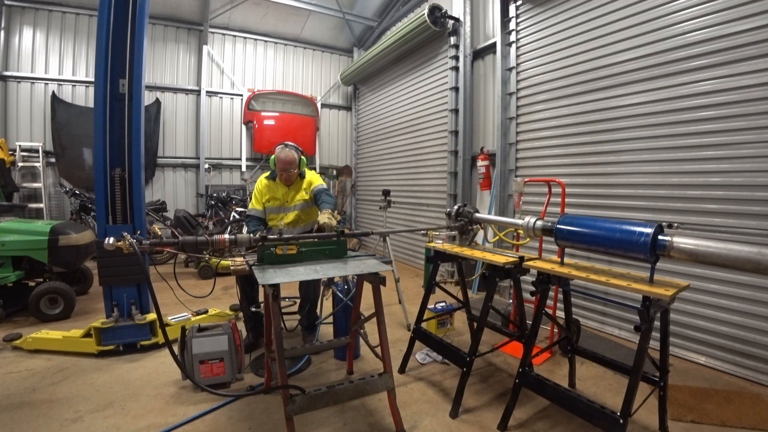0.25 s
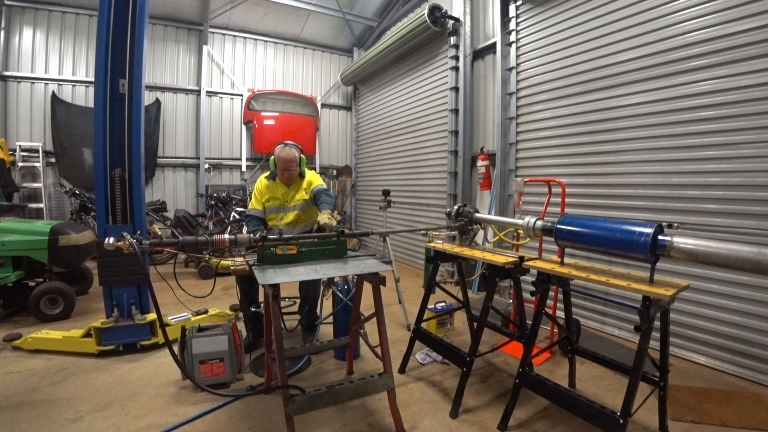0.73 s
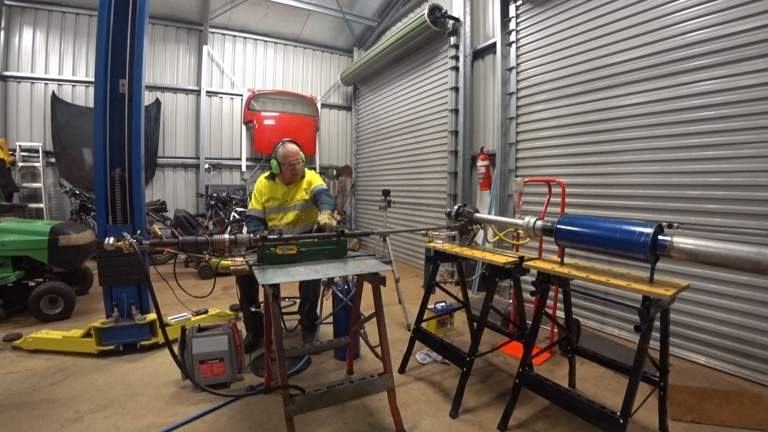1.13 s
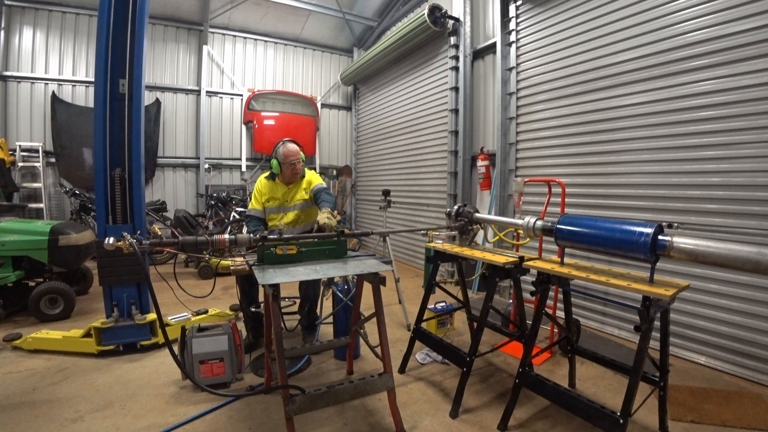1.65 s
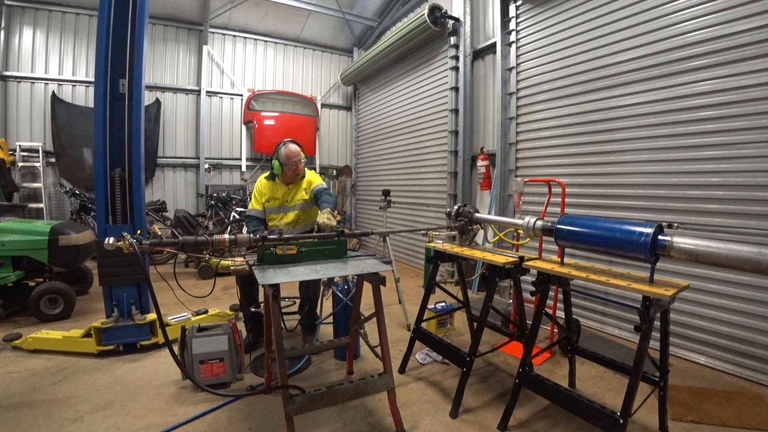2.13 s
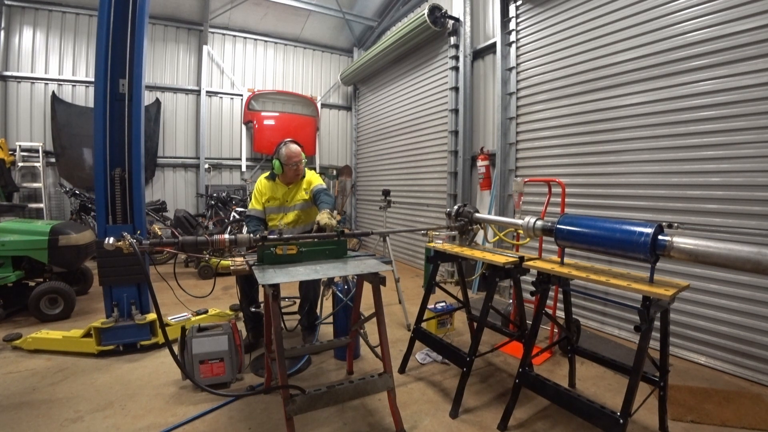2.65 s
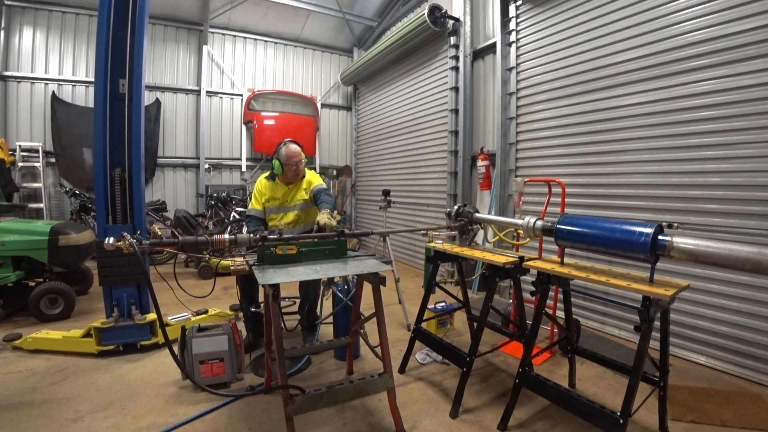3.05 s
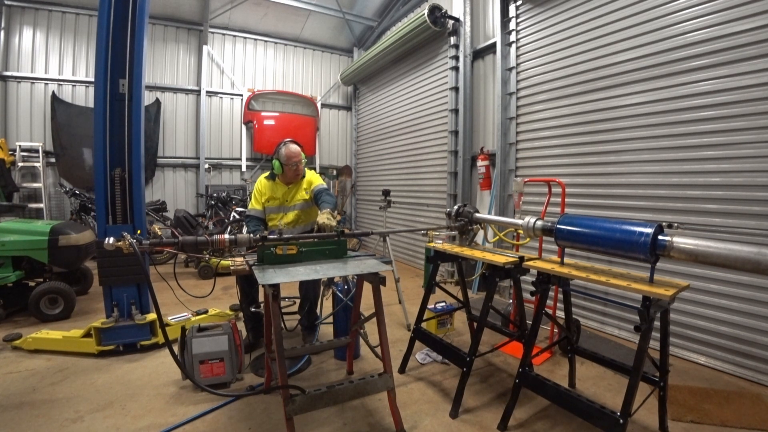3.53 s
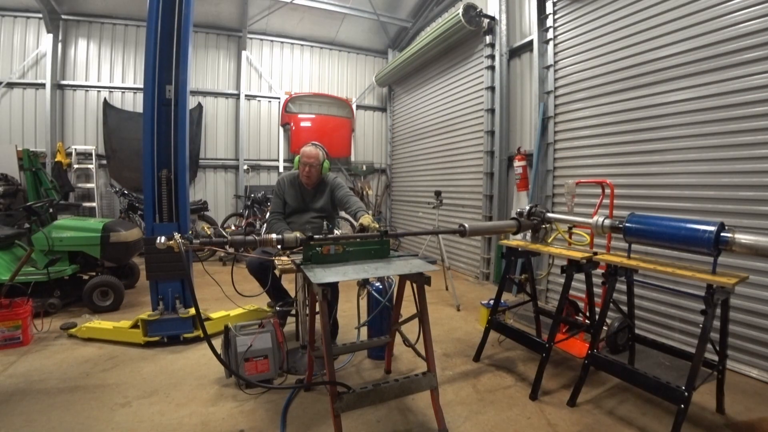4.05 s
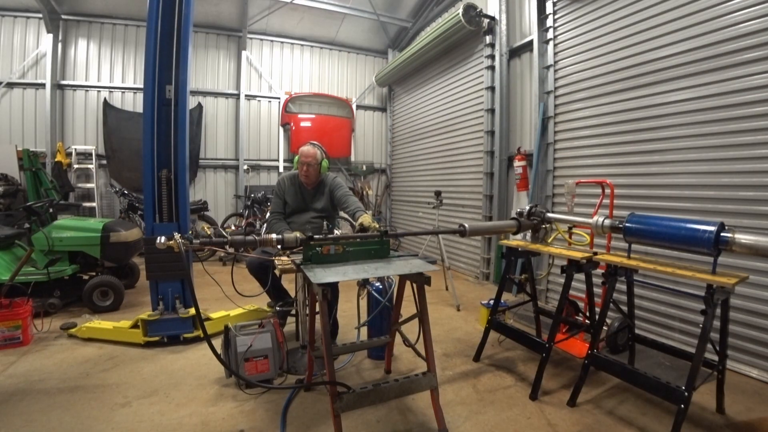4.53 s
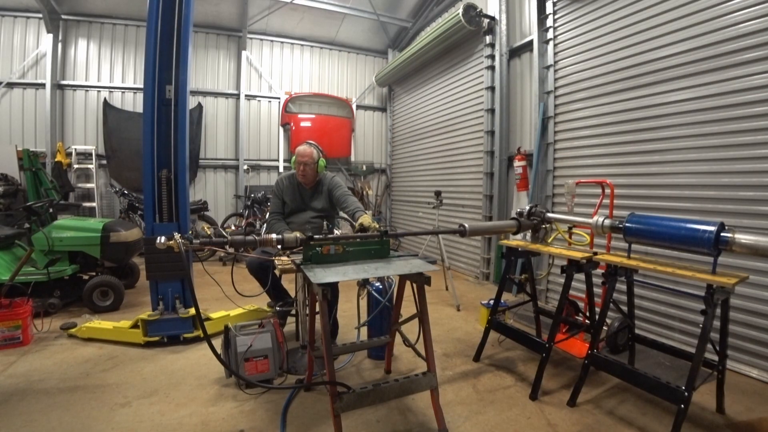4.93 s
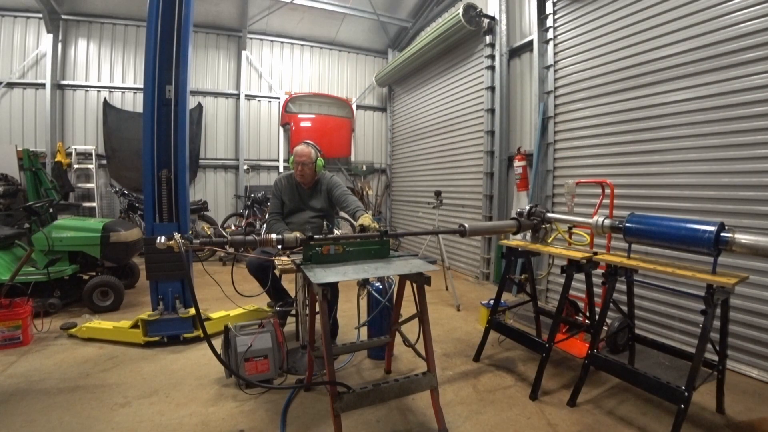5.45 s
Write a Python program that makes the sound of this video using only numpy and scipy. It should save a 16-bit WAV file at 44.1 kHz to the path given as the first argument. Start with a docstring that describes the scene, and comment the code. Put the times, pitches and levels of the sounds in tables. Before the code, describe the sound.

A homemade pulse engine cracks and booms in irregular, deafening bangs inside a steel shed, then cuts abruptly to a faint steady gas hiss.

```python
"""A homemade pulse detonation engine runs in a steel shed, its gas valve spitting twenty times a second.
Only some charges detonate: each cracks, booms and slaps back off the walls; others just pop or roar.
Blasts, pops, spits and hiss are shaped noise; the echoes and thumps are short waves of a few cycles.
A limiter squashes the din. Then comes a cut, reverberation and all, to a separate stretch of gas hiss,
coloured by the resonances of pipework."""
import sys
import numpy as np
from scipy import signal
from scipy.fft import rfft, irfft, next_fast_len
from scipy.io import wavfile

SR = 44100
rng = np.random.default_rng(int(sys.argv[2]) if len(sys.argv) > 2 else 0)


def unload_wav(signal):
    """Save mono or channel-first audio to the path in sys.argv[1] as 16-bit WAV at rate SR, clipped to [-1, 1]."""
    wavfile.write(
        sys.argv[1],
        SR,
        np.round(np.clip(np.atleast_2d(signal).T, -1, 1) * 32767).astype(np.int16),
    )


N = 251370

# charges that detonate: (time [s], strength [dB], crack [dB], ring length [factor],
# boom [dB], body [dB], bark [dB])
DETONATIONS = [(-.1, -0.5, -9, 0.88, 6, 1.5, 3), (.044, -1.5, 0, 1.35, 4, 3, 3),
               (.343, 0.5, -2, 1.71, 5, -4.5, 3.5), (.644, -3.5, 7.5, 1.7, -1, 2, -5),
               (.995, -1, 4, 1.1, 6, -0.5, 1.5), (1.196, 0, -5, 0.97, -3, 1.5, 2.5),
               (1.394, -1, -7.5, 0.86, 4, -0.5, 4), (1.496, -0.5, -7, 0.95, 2, 2.5, 3),
               (1.645, 2.5, -19, 0.7, 1, 0.5, 1.5), (1.797, -1.5, 5, 1.04, 0.5, 3, 0),
               (1.947, -0.5, -7, 0.63, 0, -3, 2), (2.048, -.5, -15, 0.91, 2.5, 1, 2.5),
               (2.247, -1, 6.5, 1.28, 5, 1.5, 0.5), (2.547, -3.5, -2, 1.02, 2.5, 2, 5),
               (2.697, -1, 3, 1.28, 3.5, 0, 4.5), (2.897, -2.5, 1, 1.13, 0, -1, 2.5),
               (2.997, 0, 3.5, 0.46, 3, 1, 2), (3.097, 2, -1, 1.33, -4, -1, 4.5),
               (3.198, 1, 1, 0.66, -11.5, 1.5, -2), (3.299, 2.5, -2, 0.78, -7, 0.5, 4.5),
               (3.399, 1.5, 1, 0.69, -2, 1, 3.5), (3.499, -2.5, -2, 2.2, -3, -2.5, 5.5)]
# weak burns placed singly, in time order: (time [s], relative level [dB])
WEAK_BURNS = [(.16, -9.5), (.212, -6), (.445, -9.5), (.509, -12), (.562, -13), (.594, -15), (.705, -5),
              (.799, -11), (.945, -19), (1.111, -6.5), (1.56, -6.5), (2.314, -11), (2.364, -4.5),
              (2.465, -5.5), (2.815, -9), (3.55, -16)]
# hard spits of the valve: (time [s], relative level [dB])
HARD_SPITS = [(.273, 0), (0.444, -5), (0.745, -6.5), (0.8, -2.5), (.898, -8), (1.891, 0.5), (2.362, -4.5),
              (2.417, -2), (2.469, -7), (2.647, -12), (2.749, -3), (2.797, -5.5), (2.947, -4), (3.024, 0.5),
              (3.137, -10), (3.229, -14), (3.335, -13), (3.44, -5), (3.548, -5), (3.582, -4)]
# broad colour of a blast: (frequency [Hz], relative level [dB])
BLAST_COLOUR = [(25, -40), (65, -20.5), (100, -25), (135, -13), (205, -14), (285, -2), (520, -4),
                (850, -6.5), (1300, -11), (1900, -15.5), (2900, -15), (4500, -22), (6200, -14), (8300, -17),
                (11200, -12.5), (15500, -21)]
# resonances of tube and shed: (frequency [Hz], width [Hz], relative level [dB])
TUBE_MODES = [(316.7, 26, 5), (421, 9.2, 10), (496, 19, -4.5), (557, 6, 3), (627, 13, 0.5), (659, 30, -3.5),
              (712, 12, -1), (799.6, 24, 8), (993, 19.5, -1), (1110, 5.7, -10), (1187, 10, 1.5),
              (1234, 11, -4)]
# left minus right for the engine: (frequency [Hz], difference [dB])
ENGINE_PAN = [(60, 0), (110, 1), (200, -4), (380, -2.5), (700, -4.5), (1290, -0.5), (2380, 0.5), (4400, 1),
              (8120, 1), (15000, -0.5)]

CUT_S = 3.609  # the cut to the hiss
RING = 32768  # samples worked out for one blast
VALVE_FIRST_S, VALVE_CYCLE_S = .0435, .05007


def engine():
    """Detonations led by their shock fronts, roaring flames, dull pops of weak burns and bright spits."""
    blasts = detonations(same_share=0.4, modes_db=-2.5, direct_s=0.012, swell_s=0.019, swell_share=0.58)
    waves = pressure_waves(scatter_db=2.36, scatter_octaves=0.045, pop_db=4.5, pop_fade_s=0.067)
    flames = roars(width_octaves=0.22, skirt_hz=1940)
    # pops and punches are kept free of deep bass
    bass_cut = signal.butter(4, 240, "high", fs=SR, output="sos")
    puffs = signal.sosfilt(bass_cut, weak_pops() + punches())
    mix = from_db(-16.5) * blasts + waves + thumps() + flames
    return mix + from_db(-10.0) * snaps() + from_db(-2.5) * puffs + from_db(-5.5) * spits()


def detonations(same_share, modes_db, direct_s, swell_s, swell_share):
    """Every blast takes the same paths through the shed: its boom partly repeats, its treble is new."""
    # ringing steel: (frequency [Hz], width [Hz], relative level [dB])
    steel_modes = [(1336, 29, -5), (1480, 50, -8.5), (1714, 20, -8), (2780, 160, -8.5), (2870, 26, -11),
                   (3200, 84, -15), (4170, 460, -18.5), (5350, 460, -17), (5500, 48, -18), (6700, 140, -11),
                   (10000, 180, -10), (11700, 100, -6), (11780, 110, -7.5)]
    # the shed by band: (frequency [Hz], time to fall 60 dB before the ring length factor [s],
    # direct sound over reverberation before each crack [dB], rise [s])
    shed_bands = [(102, 1.47, -19, 0.045), (333, 1.4, -26, 0.069), (690, 1.12, 3, 0.00094),
                  (1370, 1.17, -33, 0.003), (3270, 1.83, -23, 0.00033), (5500, 1.22, 0, 0.00033),
                  (11400, 0.46, -8.5, 0.00039)]
    hz, t, out = bins(RING), np.arange(RING) / SR, np.zeros((2, N))
    colour = resonant(hz, BLAST_COLOUR, TUBE_MODES + steel_modes, modes_db)
    # the roughness grows with pitch
    colour = colour * ripple(RING, spacing_hz=28.4, depth_db=2.5) ** (hz / (hz + 1500))
    centres, t60, direct_db, rise = np.array(shed_bands).T[:, :, None]
    # overlapping bands that add up to the whole
    bands = np.array([at_hz(np.c_[centres, share], hz) for share in np.eye(len(shed_bands))])
    direct = from_db(direct_db) * np.exp(-t / direct_s)
    # the fronts arrive, then the reverberation builds a little before it dies
    attack = 1 - np.exp(-t / rise)
    swell = 1 - swell_share * np.exp(-t / swell_s)
    same = np.clip(same_share, 0, 1) / (1 + (hz / 2500) ** 2)
    paths = stereo_noise(RING, ENGINE_PAN)
    for s, db, crack_db, length, *burn_db in DETONATIONS:
        field = np.sqrt(same) * paths + np.sqrt(1 - same) * stereo_noise(RING, ENGINE_PAN)
        # no two charges burn alike: each has its own boom, bark and uneven spectrum
        burn = burn_colour(hz, burn_db) * ripple(RING, spacing_hz=70.25, depth_db=3.0)
        decay = from_db(-60 * t / (t60 * length))
        envelope = attack * (swell + from_db(crack_db) * direct) * decay
        in_bands = irfft(field * colour * burn * bands[:, None])
        blast = np.sum(in_bands * envelope[:, None], axis=0)
        add(out, from_db(db) * blast, s)
    return out


def burn_colour(hz, levels_db):
    """Gain from one charge's boom, body and bark: three broad bumps in its spectrum."""
    # boom, body and bark: (frequency [Hz], width [octaves])
    burn_bumps = [(280, 0.68), (780, 0.13), (1205, 0.36)]
    return from_db(sum(db * hump(hz, centre, octaves) for db, (centre, octaves) in zip(levels_db, burn_bumps)))


def pressure_waves(scatter_db, scatter_octaves, pop_db, pop_fade_s):
    """Each firing sends a wave of a few cycles round the shed; every surface throws back its own part."""
    # the pressure wave and its returns from floor, walls and roof:
    # (delay [s], spread [s], typical frequency [Hz], typical level [dB])
    echo_paths = [(.003, 0.0013, 710, -10), (.0095, 0.0015, 452, -22), (.0115, 0.002, 750, -16.5),
                  (.021, 0.0025, 770, -18.5), (.028, 0.0034, 318, -23.5), (0.033, 0.002, 1160, -22),
                  (.038, 0.0022, 430, -17.5), (.0455, 0.0037, 760, -20.5), (.049, 0.0022, 415, -22.5),
                  (0.053, 0.002, 1190, -28.5), (.058, .003, 337, -25), (.063, 0.0014, 660, -17),
                  (.069, 0.0025, 765, -21), (.072, 0.0029, 403, -27), (.077, 0.0028, 635, -26.5),
                  (.081, 0.002, 470, -19), (.085, 0.0031, 805, -20), (.105, 0.0023, 745, -19),
                  (.109, 0.0025, 408, -28), (.123, 0.0047, 313, -34)]
    t, out = np.arange(RING // 4) / SR, np.zeros((2, N))
    delay, spread, centre, level_db = np.array(echo_paths).T[:, :, None]
    phase = rng.random(delay.shape)
    pan = from_db(np.array([[1], [-1]]) * at_hz(ENGINE_PAN, centre.T) / 2)
    firings = [(s, from_db(db) * burn_colour(centre, burn_db)) for s, db, _, _, *burn_db in DETONATIONS]
    # the later echoes of a weak burn are fainter
    firings += [(s, from_db(db + pop_db) * np.exp(-delay / pop_fade_s)) for s, db in WEAK_BURNS]
    for s, gain in firings:
        louder, higher = rng.standard_normal((2, len(echo_paths), 1))
        pitch = centre * 2 ** (scatter_octaves * higher)
        cycles = np.cos(2 * np.pi * (pitch * (t - delay) + phase))
        waves = np.exp(-.5 * ((t - delay) / spread) ** 2) * cycles
        add(out, pan @ (gain * from_db(level_db + scatter_db * louder) * waves), s)
    return out


def thumps():
    """A short low wave comes a moment after every detonation."""
    delay_s, spread_s, pitch_hz, level_db = 0.062, 0.0037, 170, -29
    t, out = np.arange(RING // 4) / SR - delay_s, np.zeros((2, N))
    wave = np.exp(-.5 * (t / spread_s) ** 2) * np.cos(2 * np.pi * pitch_hz * t)
    pan = from_db(np.array([[1], [-1]]) * at_hz(ENGINE_PAN, pitch_hz) / 2)
    for s, db, *_ in DETONATIONS:
        add(out, from_db(db + level_db) * pan * wave, s)
    return out


def shock_fronts():
    """Detonations as sharp fronts, stronger where the crack is: (time [s], relative level [dB])."""
    return [(s, db + 0.44 * crack_db) for s, db, crack_db, *_ in DETONATIONS]


def snaps():
    """Each shock front makes a very short burst of high treble."""
    colour = hump(bins(RING // 2), 12600, 0.22)
    return bursts(shock_fronts(), colour, rise_s=0.0023, fall_s=0.0047,
                  room_db=-17, room_t60=.2, lead_s=.0011)


def punches():
    """The pressure front comes straight from the tube's mouth as a short, broad burst."""
    hz = bins(RING // 2)
    colour = resonant(hz, BLAST_COLOUR, TUBE_MODES, 0) * hump(hz, 2210, 1.06)
    return bursts([(s, db - 14.5) for s, db in shock_fronts()], colour, rise_s=0.0011, fall_s=0.0071,
                  room_db=-24, room_t60=0.21, lead_s=.0003)


def weak_pops():
    """Charges that fail to detonate give dull pops coloured by the tube."""
    hz = bins(RING // 2)
    colour = resonant(hz, BLAST_COLOUR, TUBE_MODES, 0) * hump(hz, 280, 2.6)
    return bursts(WEAK_BURNS + idle_cycles(-19.5, scatter_db=3.0), colour, rise_s=0.0056, fall_s=0.012,
                  room_db=-17.0, room_t60=0.79, lead_s=0.00049)


def spits():
    """The valve lets out bright, short jets of gas."""
    hz = bins(RING // 2)
    jet = hump(hz, 11560, 0.22) + 0.5 * hump(hz, 5400, 0.99)
    jet = jet * ripple(RING // 2, spacing_hz=128.3, depth_db=2.5)
    return bursts(valve_spits(lag_s=.0015), jet, rise_s=0.0044, fall_s=0.0048,
                  room_db=-22.5, room_t60=0.48, lead_s=0.0019)


def valve_spits(lag_s):
    """Soft spits on the valve's beat, one after each detonation, and hard ones: (time [s], relative level [dB])."""
    soft = [(s + lag_s, db) for s, db in idle_cycles(-11.5, scatter_db=2.5)]
    # the valve stays shut after a detonation, then spits
    blowback_s, blowback_db = 0.0705, -8.5
    return soft + [(s + blowback_s, blowback_db) for s, *_ in DETONATIONS] + HARD_SPITS


def idle_cycles(db, scatter_db):
    """Valve beats free of hard spits, detonations and the beat after each: (time [s], relative level [dB])."""
    ticks = np.arange(VALVE_FIRST_S, CUT_S, VALVE_CYCLE_S)
    levels = db + scatter_db * rng.standard_normal(len(ticks))
    fired = [s + k * VALVE_CYCLE_S for s, *_ in DETONATIONS for k in range(2)]
    taken = np.array(fired + [s for s, _ in HARD_SPITS])
    free = np.abs(ticks[:, None] - taken).min(axis=1) > VALVE_CYCLE_S / 4
    return list(zip(ticks[free], levels[free]))


def bursts(events, colour, rise_s, fall_s, room_db, room_t60, lead_s):
    """Short puffs of gas, each trailed by the shed's reverberation."""
    size = RING // 2
    t, out = np.arange(size) / SR, np.zeros((2, N))
    tail = from_db(room_db) * np.exp(-np.log(1000) * t / room_t60)
    envelope = (1 - np.exp(-(t / rise_s) ** 2)) * np.hypot(np.exp(-t / fall_s), tail)
    even_colour = colour / np.sqrt(np.mean(colour ** 2))  # rms 1
    for s, db in events:
        puff = irfft(stereo_noise(size, ENGINE_PAN) * even_colour)
        add(out, from_db(db) * envelope * puff, s - lead_s)
    return out


def roars(width_octaves, skirt_hz):
    """A slow flame rushes down the tube: a harsh note that swells and dies away."""
    # charges that burn on as a roar:
    # (time [s], level [dB], centre frequency [Hz], time to swell [s], rasp [dB])
    slow_flames = [(.343, -17, 1200, 0.028, -14), (.385, -18, 1260, 0.023, -8),
                   (.455, -24.5, 1240, 0.039, -3), (3.10, -23, 1090, 0.045, -28),
                   (3.298, -35, 990, 0.13, -22)]
    hz, t, out = bins(RING), np.arange(RING) / SR, np.zeros((2, N))
    for s, db, centre_hz, swell_s, rasp_db in slow_flames:
        colour = hump(hz, centre_hz, width_octaves) + from_db(rasp_db) * hump(hz, skirt_hz, 0.6)
        colour = colour * ripple(RING, spacing_hz=62.2, depth_db=2.5)
        flame = irfft(stereo_noise(RING, ENGINE_PAN) * colour / np.sqrt(np.mean(colour ** 2)))
        swell = t / swell_s * np.exp(1 - t / swell_s)
        add(out, from_db(db) * swell * flame, s)
    return out


def limiter(x, threshold_db, excess_fall_db_per_s, sense_s, slope):
    """The gain drops just ahead of each front, and creeps back during the tail."""
    look_ahead_s = .004
    keep = np.exp(-1 / (sense_s * SR))
    power = signal.lfilter([1 - keep], [1, -keep], np.mean(x ** 2, axis=0))
    over = np.maximum(10 * np.log10(np.maximum(power, 1e-12)) - threshold_db, 0)
    # the excess jumps up at once but falls at a steady rate
    ramp = excess_fall_db_per_s * np.arange(N) / SR
    held = np.maximum.accumulate(over + ramp) - ramp
    ahead = np.interp(np.arange(N) + look_ahead_s * SR, np.arange(N), held)
    return x * from_db(-np.clip(slope, 0, 1) * ahead)


def gas_hiss():
    """A steady flow of gas sounds the resonances of the pipework; the lowest ones waver."""
    # turbulence of the gas: (frequency [Hz], relative level [dB])
    turbulence = [(30, -58), (110, -38.5), (330, -23), (520, -14), (690, -15), (780, -8), (1100, -10.5),
                  (1330, -10.5), (1450, -13.5), (2300, -12), (3050, -5), (3500, -14.5), (8800, -14),
                  (9900, -24), (12300, -18.5), (13400, -28), (15500, -29)]
    # pipework resonances: (frequency [Hz], width [Hz], relative level [dB])
    pipe_modes = [(894, 13, 3.5), (966, 30, -4), (1020, 40, -12), (1217, 45, -1), (1300, 38, -3.5),
                  (1518, 19, 5), (1790, 24, -2.5), (1850, 55, -2), (1954, 68, -5), (2766, 127, -1.5),
                  (4260, 150, -6), (4545, 68, -7.5), (4855, 60, -9), (5100, 130, -8), (5550, 68, -11),
                  (5950, 55, -0.5), (6330, 150, -11), (6640, 61, -13), (7160, 56, -11), (7900, 61, -12),
                  (8670, 270, -7.5), (9130, 114, -4.5), (9700, 49, -12), (10600, 130, -14),
                  (11060, 180, -11.5), (11700, 90, -14), (12520, 170, -12), (14000, 160, -22)]
    # left minus right: (frequency [Hz], difference [dB])
    hiss_pan = [(60, -0.5), (110, 0), (200, -1.0), (380, -2.5), (700, -3.5), (1290, -1.5), (2380, 0.0),
                (4400, 1.0), (8120, 0.0), (15000, -0.5)]
    # pipe resonances that waver: (frequency [Hz], width [octaves], depth [dB])
    wavering_modes = [(930, 0.11, 3), (1250, 0.15, 2), (1840, 0.21, 0.8)]
    size = next_fast_len(N + N % 2)
    hz = bins(size)
    colour = resonant(hz, turbulence, pipe_modes, modes_db=0.5)
    colour = colour * ripple(size, spacing_hz=34.22, depth_db=4.5) ** (hz / (hz + 1500))
    flow = stereo_noise(size, hiss_pan) * colour
    out = irfft(flow, size)[:, :N]
    for centre_hz, octaves, depth_db in wavering_modes:
        band = irfft(flow * hump(hz, centre_hz, octaves), size)[:, :N]
        out = out + (from_db(depth_db * drift(per_s=9)) - 1) * band
    return from_db(-36) * out


def drift(per_s):
    """A slow random wander, with so many new values a second joined by straight lines."""
    return np.interp(np.arange(N) / SR * per_s, np.arange(N), rng.standard_normal(N))


def stereo_noise(size, pan):
    """Spectrum of white noise, left and right, partly alike and differing in level by pitch."""
    # left-right likeness: (frequency [Hz], likeness [0-1])
    likeness = [(60, 0.97), (250, 0.98), (600, 0.9), (1300, 0.75), (2600, 0.64), (6000, 0.81),
                (14000, 0.54)]
    hz = bins(size)
    mid, side = rfft(rng.standard_normal((2, size)))
    alike, sign = np.clip(at_hz(likeness, hz), 0, 1), np.array([[1], [-1]])
    both = np.sqrt((1 + alike) / 2) * mid + sign * np.sqrt((1 - alike) / 2) * side
    return both * from_db(sign * at_hz(pan, hz) / 2)


def resonant(hz, spectrum, modes, modes_db):
    """Gain of a broad spectrum with resonances standing on it; rms 1."""
    power = from_db(at_hz(spectrum, hz)) ** 2
    for centre, width, db in modes:
        power = power + from_db(db + modes_db) ** 2 / (1 + ((hz - centre) / width) ** 2 * 2) ** 2
    return np.sqrt(power / power.mean())


def ripple(size, spacing_hz, depth_db):
    """Countless small random peaks and dips roughen a spectrum."""
    hz = bins(size)
    knots_hz = np.arange(0, SR / 2, spacing_hz)
    return from_db(depth_db * np.interp(hz, knots_hz, rng.standard_normal(size)[:len(knots_hz)]))


def hump(hz, centre_hz, octaves):
    """A bell of height 1 in log frequency."""
    return np.exp(-.5 * (np.log2((hz + 1e-9) / centre_hz) / octaves) ** 2)


def at_hz(points, hz):
    """Read a spectrum on a log-frequency axis."""
    points = np.array(points)
    return np.interp(np.log(hz + 1e-9), np.log(points[:, 0]), points[:, 1])


def bins(size):
    """Frequencies of a transform, in Hz."""
    return np.arange(size // 2 + 1) * SR / size


def from_db(db):
    """Decibels to gain."""
    return 10 ** (np.asarray(db) / 20)


def add(out, sound, s):
    """Mix a sound in at a time in seconds."""
    start = int(round(s * SR))
    first, last = max(start, 0), min(start + sound.shape[1], N)
    out[:, first:last] += sound[:, first - start:last - start]


def scene():
    """A cut, reverberation and all, from the engine's din to a separate stretch of gas hiss."""
    # a very short crossfade makes the cut
    din_share = np.clip((CUT_S - np.arange(N) / SR) / 0.013 + .5, 0, 1)
    din = limiter(engine(), threshold_db=-14.5, excess_fall_db_per_s=50.5, sense_s=0.0021, slope=0.71)
    return din_share * din + (1 - din_share) * gas_hiss()


def record(dry):
    """Peaks are rounded and the top is cut."""
    rounded = 1.046 * np.tanh(dry)
    top_cut = signal.ellip(12, .1, 80, 15900, fs=SR, output="sos")  # above 15900 Hz
    return signal.sosfilt(top_cut, rounded)


dry = scene()
out = record(dry)
unload_wav(out)
```